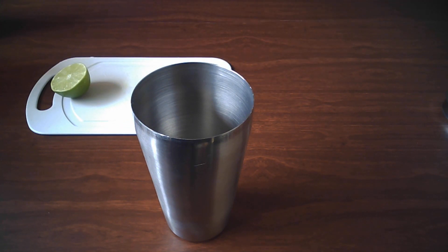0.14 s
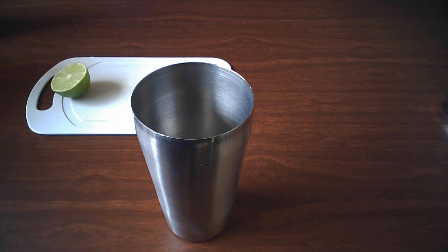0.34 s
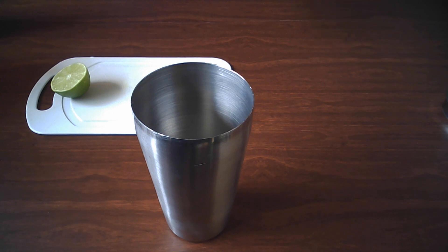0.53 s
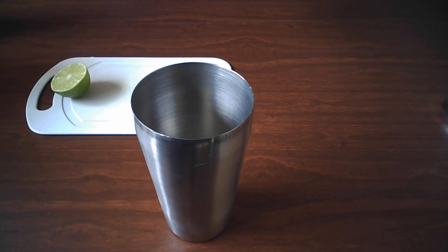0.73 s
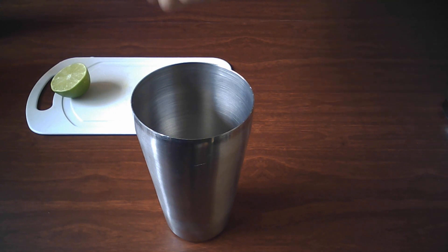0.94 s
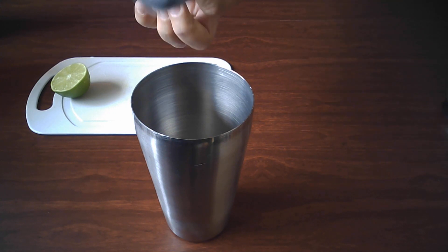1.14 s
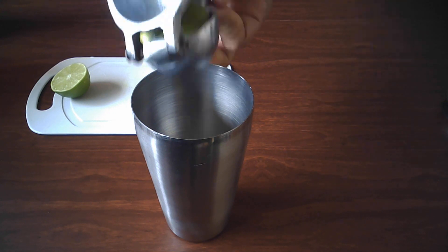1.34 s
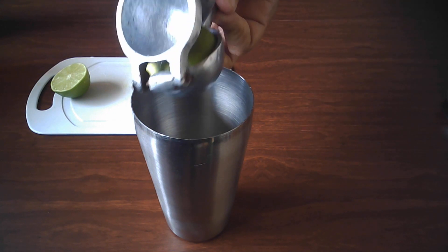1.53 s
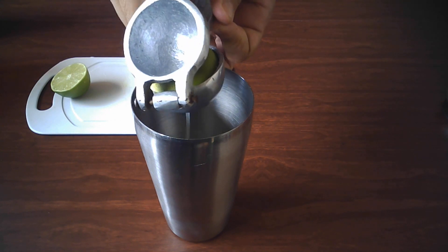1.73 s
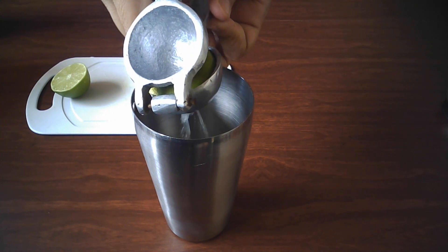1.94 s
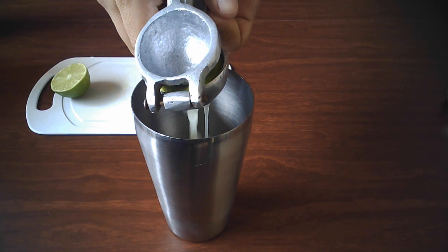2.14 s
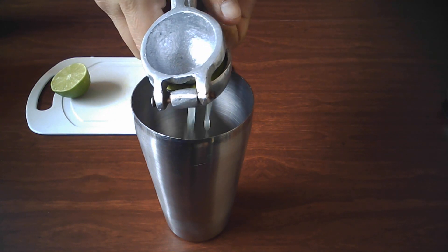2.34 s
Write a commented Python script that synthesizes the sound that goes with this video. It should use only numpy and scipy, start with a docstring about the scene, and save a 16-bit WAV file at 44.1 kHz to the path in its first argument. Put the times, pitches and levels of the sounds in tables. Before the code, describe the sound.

A metal citrus squeezer clicks lightly at the start, scrapes and ticks, then closes with a loud bright clink at 0.23 s, leaving a short ring and room echo. Faint rustles pass around 0.7 to 1.0 s. From 1.3 s wet pulp fizzes and spits, stronger after 2 s, with quick drips chirping in a steel tin near 2.3 s. Low rumble, faint hiss and hum continue throughout.

```python
"""A low rumble, hiss and faint hum lie under a small, live room throughout.
A hinged metal squeezer scrapes, then clinks shut on half a lime (0.23 s): contacts excite its modes.
Faint rustles (bands of noise) follow; from about 1.3 s the pulp fizzes and spits in noise bursts and pips.
From 2 s juice drips into a steel shaker tin: rising sine chirps, and the ring of the air in the tin."""
import sys
import numpy as np
from scipy import signal
from scipy.fft import rfft, irfft
from scipy.io import wavfile

SR = 44100
rng = np.random.default_rng(int(sys.argv[2]) if len(sys.argv) > 2 else 0)


def digitize_waveform(pressure):
    """Quantize a signal to 16-bit integers and store it at the path in sys.argv[1].

    Rows of a 2-D input are taken as channels; values are limited to [-1, 1].
    """
    field = np.atleast_2d(pressure).T
    bounded = np.clip(field, -1, 1)
    quanta = np.round(bounded * 32767).astype(np.int16)
    wavfile.write(sys.argv[1], SR, quanta)


N = 105840

# room background spectrum (frequency [Hz], relative level [dB])
FLOOR_COLOUR = [(10, -25), (21, -8), (32, 1), (52, -17), (70, -11.5), (100, -14), (135, -15.5), (175, -18),
                (250, -22), (520, -29), (700, -29), (1000, -35.5), (2400, -37), (3800, -41.5),
                (4700, -39.5), (7500, -40), (8600, -52)]
# steady hum (frequency [Hz], rms level [dB])
HUM = [(125.3, -64), (150.3, -72)]
# scraping of the halves (time [s], level [dB])
SCRAPE_LEVEL = [(0, -48), (0.01, -40), (0.048, -52), (.1, -54.5), (.14, -56.5), (.2, -55.5), (.225, -45.5),
                (.26, -78.5)]
# scrape spectrum (frequency [Hz], relative level [dB])
SCRAPE_COLOUR = [(300, -24), (1200, -10.5), (1850, 3.5), (2300, -2.5), (3000, -2), (4000, -3), (4700, -2),
                 (6800, -4.5), (7300, -6.5), (7550, 4.5), (7900, -16.5), (8500, -6), (8900, -26.5)]
# faint rustles (centre time [s], level [dB], frequency [Hz], bandwidth [Hz], half length [s])
RUSTLES = [(.72, -63.5, 6900, 1800, .045), (.935, -62.5, 4720, 377, .035), (1.03, -68, 6500, 2500, .04),
           (1.59, -62.5, 2550, 458, .035), (1.764, -68.5, 2550, 450, 0.057)]
# fizz of the pulp (time [s], treble level [dB], middle level [dB])
FIZZ_LEVEL = [(1.2, -87, -98.5), (1.46, -75, -71.5), (1.549, -65.5, -66), (1.56, -62.5, -66.5),
              (1.605, -57, -62.5), (1.65, -69.5, -68.5), (1.745, -66, -65.5), (1.83, -70.5, -72),
              (1.98, -66.5, -68), (2.05, -57.5, -62), (2.11, -58.5, -65.5), (2.219, -58, -70),
              (2.4, -63.5, -64.5)]
# fizz spectra, treble and middle (frequency [Hz], relative level [dB])
FIZZ_TREBLE_COLOUR = [(2500, -22), (3500, -10), (4800, -12), (6200, -7), (7250, -0.5), (7800, -5.5),
                      (8700, -17)]
FIZZ_MIDDLE_COLOUR = [(500, -24), (950, -6), (1350, 4), (1700, -10), (2350, 6), (2850, 0), (3200, -34.5),
                      (5000, -40)]
# larger pulp bursts (time [s], level [dB], frequency [Hz], t60 [s])
SPITS = [(1.279, -54.5, 2444, 0.023), (1.477, -52, 6600, 0.022), (1.556, -50, 2360, 0.044),
         (1.554, -52, 7100, 0.088), (1.589, -49, 2760, .04), (1.605, -47.5, 6940, 0.02),
         (1.74, -50.5, 7000, 0.045), (1.873, -50, 7400, 0.024), (1.907, -50, 6850, 0.021),
         (2.0252, -49, 6020, 0.029), (2.0617, -43.5, 7280, 0.061), (2.1296, -51, 5750, .025),
         (2.1832, -35, 6850, 0.018), (2.1872, -39, 5370, 0.025), (2.2335, -41.5, 6400, 0.015),
         (2.2477, -36.5, 5900, 0.01), (2.2725, -53, 6600, 0.032), (2.294, -49.5, 2650, .02),
         (2.3198, -48.5, 6700, 0.042)]
# bubbles left by drops of juice (time [s], level [dB], starting frequency [Hz], t60 [s])
DROPS = [(2.037, -48, 1220, 0.027), (2.3036, -29.5, 1126, 0.013), (2.304, -42.5, 1480, 0.063),
         (2.3146, -32.5, 1393, 0.042), (2.3165, -36.5, 1523, 0.031), (2.3402, -41, 3910, 0.014),
         (2.3506, -38.5, 5000, 0.013), (2.3707, -46.5, 7800, 0.027), (2.3772, -42, 1200, 0.047)]
# juice landing on the bottom of the tin (time [s], level [dB])
PATS = [(2.04, -50.5), (2.066, -51.5), (2.233, -46.5), (2.304, -55.5), (2.376, -54.5)]
# metal contacts of the squeezer (time [s], level [dB], most strongly driven frequency [Hz])
CLINKS = [(.0045, -31.5, 5200), (.0065, -30, 6930), (.0075, -39.5, 1870), (0.092, -57.5, 7800),
          (0.1548, -34.5, 6000), (0.2039, -41, 4730), (0.2156, -31, 1986), (.2288, -10, 4200),
          (.2307, -11.5, 7600), (.2328, -16, 7540), (0.2403, -24.5, 1634)]
# squeezer modes (frequency [Hz], relative level [dB], t60 while the halves touch [s],
#                 free ring re the mode [dB], free ring t60 [s])
SQUEEZER_MODES = [(1150, -15.5, .012, -25, .3), (1738, -2, .016, -30.5, 0.23), (1961, -0.5, .014, -28, .4),
                  (2622, -9.5, .012, -24.5, 0.51), (2830, -2.5, .01, -23.5, .5),
                  (3854, -14.5, .01, -24.5, .4), (4230, -14.5, .009, -36.5, .4),
                  (4677, -0.5, 0.016, -35.5, .45), (4830, -15, 0.014, -24, 0.22),
                  (5695, -6.5, 0.0094, -26.5, .42), (6500, -12.5, .012, -27.5, 0.43),
                  (7440, -16.5, .014, -13.5, .45), (7590, 3, .014, -24.5, 0.31),
                  (8250, -4.5, 0.015, -23, .37)]
# spectrum of the contact crack (frequency [Hz], relative level [dB])
CRACK_COLOUR = [(250, -27.5), (700, -7.5), (1150, -5), (1350, -16), (1750, -2.5), (2280, -22), (2800, -13),
                (3350, -9.5), (4000, -4.5), (4650, 1.5), (5000, -5), (5280, -19), (5750, 2), (6150, -8),
                (6550, -3), (7000, -8), (7600, 6), (8000, -11), (8350, 5), (8900, -24), (12000, -50)]

FLOOR_DB = -54.5
ROOM_T60_S, ROOM_GAP_S = 0.53, 0.0044
ROOM_TREBLE_DB, ROOM_TREBLE_HZ = -3, 6500  # the walls soak up the top
METAL_SEND_DB, WET_SEND_DB = -7, -10  # into the room
FIZZ_PER_S, FIZZ_SCATTER_DB = 830, 2
SPIT_WIDTH_RATIO, SPIT_SPLASH_DB = 0.066, -5  # bandwidth / frequency; added white noise
PIPS_PER_S, PIP_DB, PIP_T60_S, PIP_LOW_HZ, PIP_HIGH_HZ = 54, 5, 0.032, 4270, 7570
WET_ATTACK_S, DROP_RISE_PER_S = 0.00091, 10  # rise as a fraction of the starting frequency
TIN_HZ, TIN_T60_S, TIN_AIR_DB, TIN_WIDTH_HZ = 661, 0.14, -67, 22
CONTACT_S = 0.0004
FOCUS_OCT, SPREAD_DB = 0.53, -21.5  # width of the driven region; drive everywhere else
CRACK_DB, CRACK_T60_S, CRACK_OCT = -6.5, 0.016, 1.2
RING_WIDTH_HZ = 45  # each mode is a cluster of close partials
MIC_EDGE_HZ, TOP_HZ = 8160, 8700


def undb(db):
    """Amplitude from dB."""
    return 10 ** (np.asarray(db) / 20)


def unit(x):
    """Scale to rms 1."""
    return x / np.sqrt(np.mean(x ** 2))


def fade(t, t60_s):
    """Exponential decay by 60 dB in t60_s."""
    return np.exp(-np.log(1000) * t / max(t60_s, 1e-4))


def add(out, at_s, x):
    """Mix x into out at a time."""
    i = max(int(at_s * SR), 0)
    out[i:i + len(x)] += x[:max(N - i, 0)]


def colour(x, points):
    """Shape the spectrum by (frequency [Hz], level [dB]) points; rms 1."""
    hz, db = np.array(points).T
    f = np.maximum(np.fft.rfftfreq(len(x), 1 / SR), 1)
    gain = undb(np.interp(np.log(f), np.log(hz), db))
    return unit(irfft(rfft(x) * gain, len(x)))


def band_noise(hz, width_hz, size):
    """Noise through one resonance; rms 1."""
    f = np.fft.rfftfreq(size, 1 / SR) + 1e-3
    resonance = 1 / (1 + 1j * (f * f - hz * hz) / (f * width_hz))
    return unit(irfft(rfft(rng.standard_normal(size)) * resonance, size))


def background():
    """Room rumble and hiss are coloured noise; the hum is steady sines."""
    t = np.arange(N) / SR
    hum = sum(undb(db) * np.sqrt(2) * np.sin(2 * np.pi * (hz * t + rng.random())) for hz, db in HUM)
    return undb(FLOOR_DB) * colour(rng.standard_normal(N), FLOOR_COLOUR) + hum


def room(x):
    """Diffuse wall echo: decaying noise after a short gap, duller at the top."""
    t = np.arange(SR) / SR
    echo = rng.standard_normal(SR) * fade(t, ROOM_T60_S) * (t > ROOM_GAP_S)
    echo /= np.sqrt(np.sum(echo ** 2))
    f = np.maximum(np.arange(SR // 2 + 1), 1)  # 1 s response: bins are 1 Hz apart
    treble = 1 / (1 + (ROOM_TREBLE_HZ / f) ** 6)
    echo = irfft(rfft(echo) * undb(ROOM_TREBLE_DB * treble), SR)
    return signal.fftconvolve(x, echo)[:N]


def handling():
    """Metal grinds on metal in dense slips of uneven size; faint rustles are swells of band noise."""
    t, (s, db) = np.arange(N) / SR, np.array(SCRAPE_LEVEL).T
    slips = rng.standard_normal(N) * undb(1.5 * rng.standard_normal(N))
    out = colour(slips, SCRAPE_COLOUR) * undb(np.interp(t, s, db)) * (t < s[-1])
    for at_s, db, hz, width_hz, half_s in RUSTLES:
        out += undb(db) * band_noise(hz, width_hz, N) * np.exp(-((t - at_s) / half_s) ** 2)
    return out


def pulp():
    """Random impulses coloured in two bands make the fizz; larger bursts, noise with a resonance, spit."""
    t, (s, treble_db, middle_db) = np.arange(N) / SR, np.array(FIZZ_LEVEL).T
    out = np.zeros(N)
    for db, points in ((treble_db, FIZZ_TREBLE_COLOUR), (middle_db, FIZZ_MIDDLE_COLOUR)):
        sizes = undb(FIZZ_SCATTER_DB * np.minimum(rng.exponential(size=N), 5))
        signs = rng.choice([-1, 1], N)
        bursts = sizes * signs * (rng.random(N) < FIZZ_PER_S / SR)
        out += colour(bursts, points) * undb(np.interp(t, s, db))
    t = t[:SR // 10]
    onset = np.minimum(t / WET_ATTACK_S, 1)
    for at_s, db, hz, t60_s in SPITS:
        body = band_noise(hz, SPIT_WIDTH_RATIO * hz, len(t))
        splash = undb(SPIT_SPLASH_DB) * rng.standard_normal(len(t))
        add(out, at_s, undb(db) * (body + splash) * fade(t, t60_s) * onset)
    return out


def pips():
    """Tiny bubbles burst in the fizz at random times, each a decaying sine of its own pitch."""
    out, t = np.zeros(N), np.arange(SR // 30) / SR
    s, treble_db, _ = np.array(FIZZ_LEVEL).T
    onset = np.minimum(t / WET_ATTACK_S, 1)
    at_s = s[0]
    for wait, pitch, size in rng.random(size=(200, 3)):
        at_s -= np.log(1 - wait) / PIPS_PER_S  # exponential waiting time
        hz = PIP_LOW_HZ + pitch * (PIP_HIGH_HZ - PIP_LOW_HZ)
        gain = 2 * size * undb(PIP_DB + np.interp(at_s, s, treble_db))
        add(out, at_s, gain * np.sin(2 * np.pi * hz * t) * fade(t, PIP_T60_S) * onset)
    return out


def juice():
    """Bubbles chirp upward; landing juice rings the air column of the tin, a trickle stirs it."""
    out, t = np.zeros(N), np.arange(SR // 4) / SR
    onset = np.minimum(t / WET_ATTACK_S, 1)
    for at_s, db, hz, t60_s in DROPS:
        cycles = hz * (t + DROP_RISE_PER_S * t * t / 2)
        add(out, at_s, undb(db) * onset * fade(t, t60_s) * np.sin(2 * np.pi * cycles))
    for at_s, db in PATS:
        add(out, at_s, undb(db) * onset * fade(t, TIN_T60_S) * np.sin(2 * np.pi * TIN_HZ * t))
    trickle = np.interp(np.arange(N) / SR, [1.3, 2.2], [0, 1])
    return out + undb(TIN_AIR_DB) * trickle * band_noise(TIN_HZ, TIN_WIDTH_HZ, N)


def contact_drive(hz, focus_hz, width_oct):
    """Drive of one contact: a bell about its own region over a weak flat floor."""
    return undb(SPREAD_DB) + np.exp(-(np.log2(hz / focus_hz) / width_oct) ** 2)


def squeezer():
    """Each contact cracks, drives the modes near its region hard and leaves a faint, beating ring."""
    out, t = np.zeros(N), np.arange(SR * 3 // 4) / SR
    onset = np.minimum(t / CONTACT_S, 1)
    modes = []
    for hz, db, t60_s, ring_db, ring_t60_s in SQUEEZER_MODES:
        damped = np.sin(2 * np.pi * hz * t) * fade(t, t60_s)
        free = undb(ring_db) * band_noise(hz, RING_WIDTH_HZ, len(t)) * fade(t, ring_t60_s)
        modes.append((hz, undb(db) * (damped + free)))
    for at_s, db, focus_hz in CLINKS:
        points = [(hz, level_db + 20 * np.log10(contact_drive(hz, focus_hz, CRACK_OCT)))
                  for hz, level_db in CRACK_COLOUR]
        crack = colour(rng.standard_normal(len(t)), points) * fade(t, CRACK_T60_S)
        ring = sum(contact_drive(hz, focus_hz, FOCUS_OCT) * mode for hz, mode in modes)
        add(out, at_s, undb(db) * onset * (ring + undb(CRACK_DB) * crack))
    return out


def scene():
    """Sum the direct sources, the room's echo of metal and wet sounds, and the background."""
    metal = squeezer()
    wet = pulp() + pips() + juice()
    echo = room(undb(METAL_SEND_DB) * metal + undb(WET_SEND_DB) * wet)
    return (metal + wet + handling() + echo + background())[None]


def record(dry):
    """Narrow-band microphone chain: a low-pass roll-off, then a steep cut of the top."""
    rolloff = signal.butter(8, MIC_EDGE_HZ, fs=SR, output="sos")
    cut = signal.ellip(8, .3, 42, TOP_HZ, fs=SR, output="sos")  # ripple, stopband [dB]
    return signal.sosfilt(cut, signal.sosfilt(rolloff, dry))


dry = scene()
out = record(dry)
digitize_waveform(out)
```